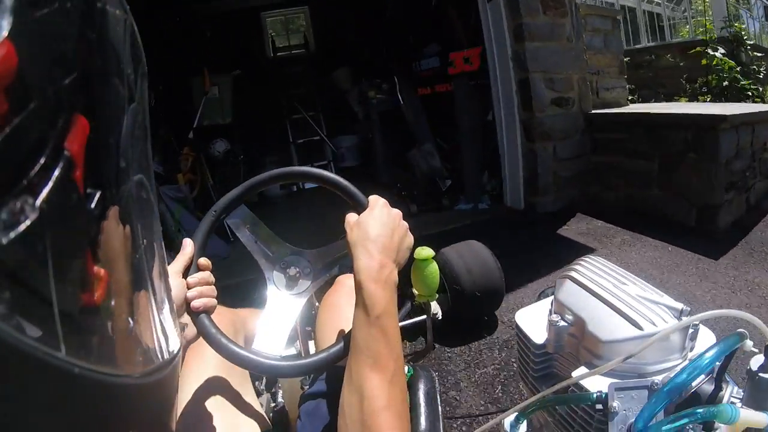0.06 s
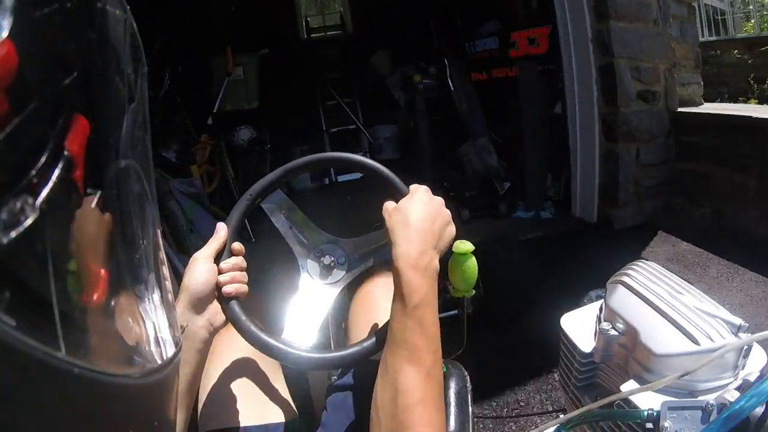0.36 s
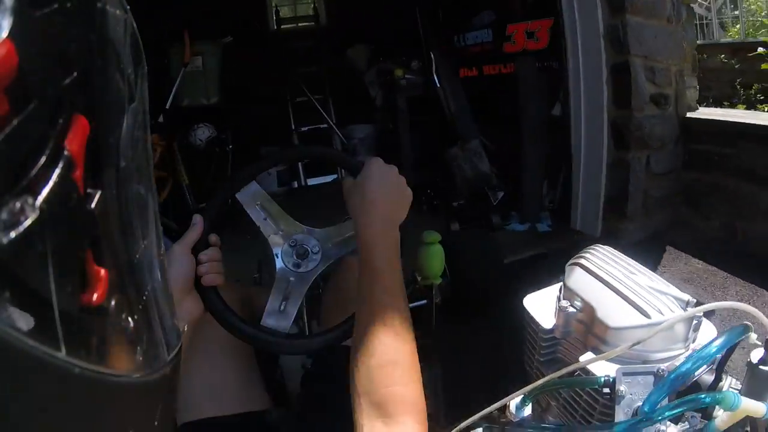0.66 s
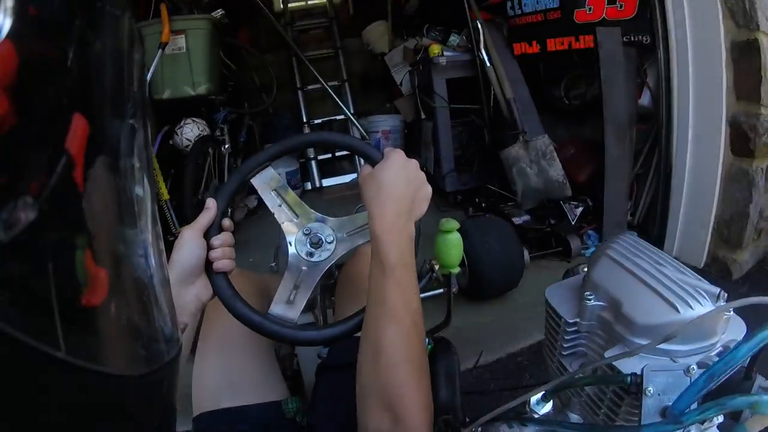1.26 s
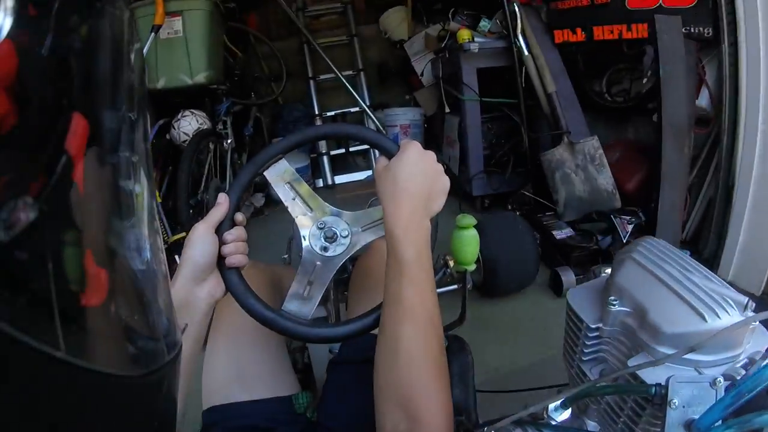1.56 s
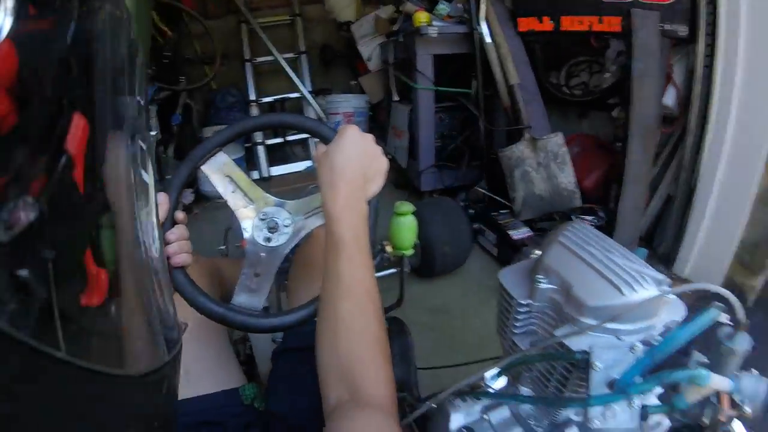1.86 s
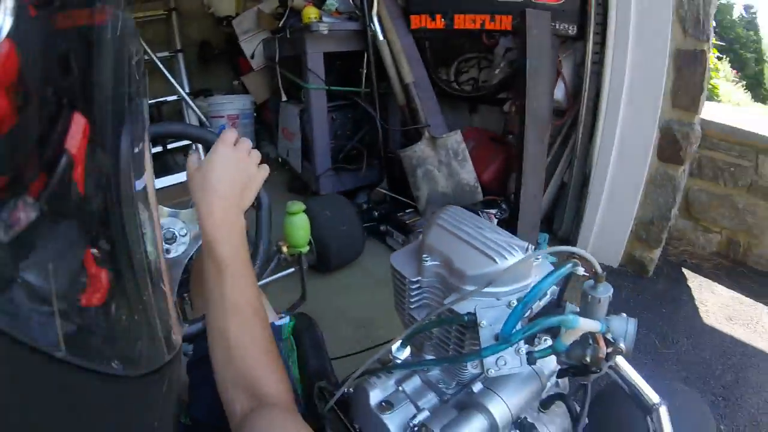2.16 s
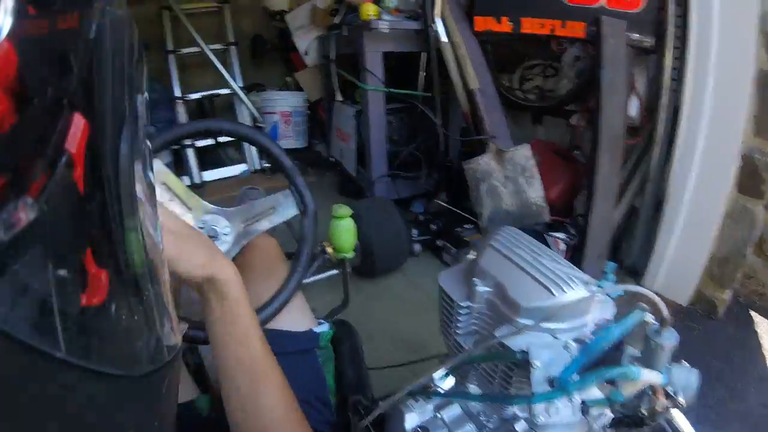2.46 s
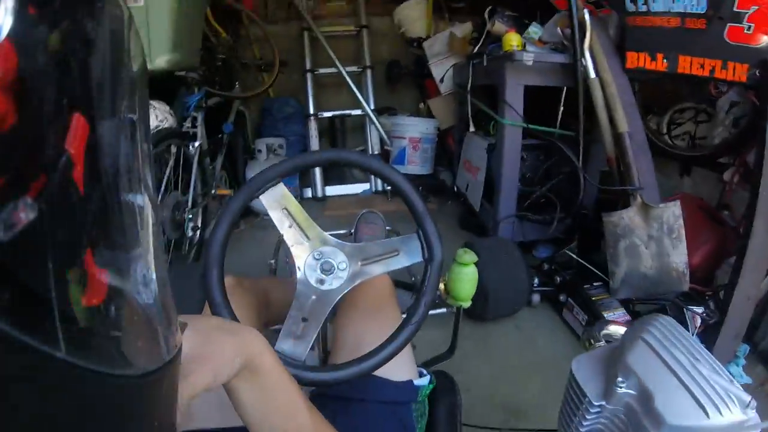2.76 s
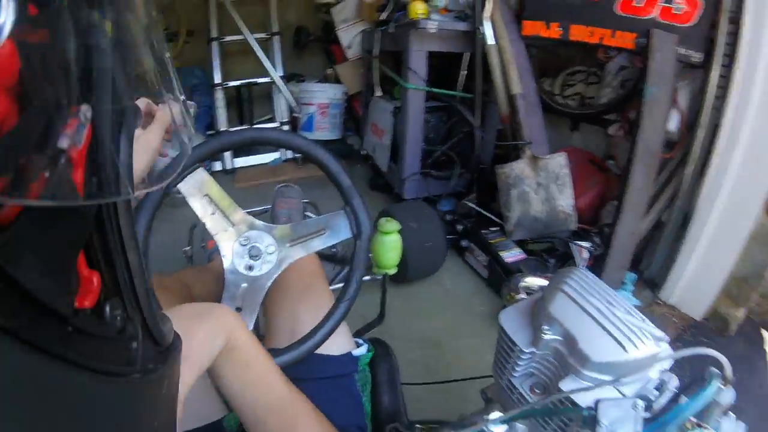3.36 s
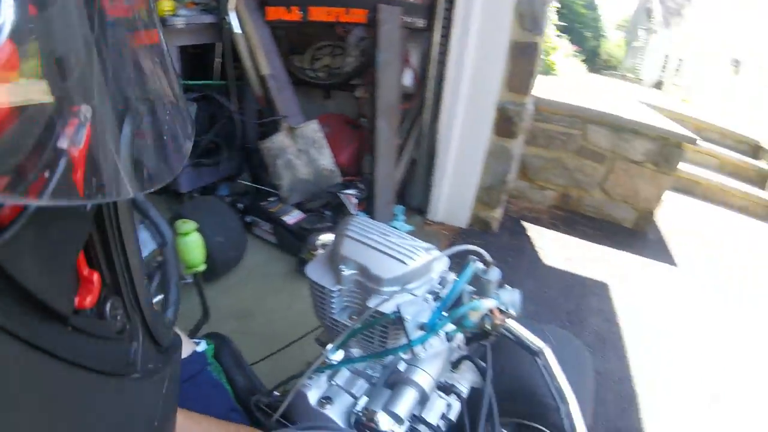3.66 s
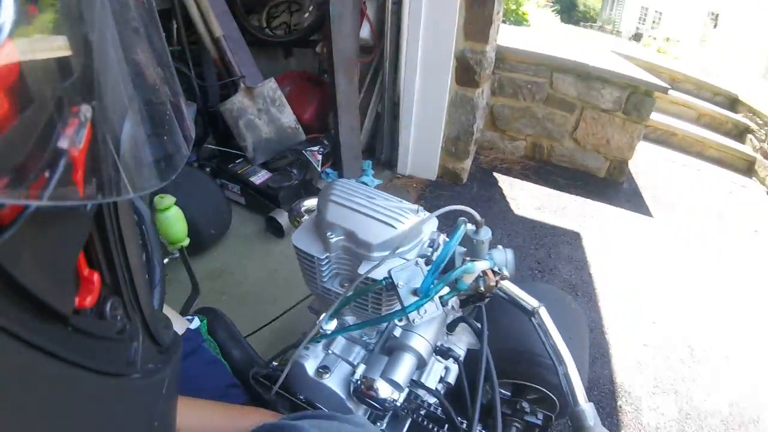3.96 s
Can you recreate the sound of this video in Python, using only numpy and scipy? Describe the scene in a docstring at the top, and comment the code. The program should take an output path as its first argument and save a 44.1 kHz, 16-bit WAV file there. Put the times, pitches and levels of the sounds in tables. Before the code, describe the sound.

A small go-kart engine idles for the whole four seconds, thumping low and evenly about eleven times a second, heard close from the driver's helmet with a short garage echo. Light metallic clatter, a whirr and a few faint ticks run along with it. A soft, dull bump comes near 2.4 seconds. At about 3 seconds the visor ratchets with one brief clack and another bump, as the engine dips slightly.

```python
"""The low, even thump of an idling kart, heard from the driver's helmet as it rolls into a garage.
Each firing of the single-cylinder four-stroke rings the exhaust and slaps back off the walls.
Valves and piston clatter in step with the crank, over stray ticks and the whirr of fan and gears.
The helmet takes a few soft bumps, and near 3 s its visor ratchets with one brief clack."""
import sys
import numpy as np
from scipy import signal
from scipy.fft import rfft, irfft
from scipy.io import wavfile

SR = 44100
rng = np.random.default_rng(int(sys.argv[2]) if len(sys.argv) > 2 else 0)


def store_wav(level_fs):
    """Save 16-bit WAV to argv[1]."""
    pcm = np.round(np.clip(np.atleast_2d(level_fs), -1, 1) * 32767)
    wavfile.write(sys.argv[1], SR, pcm.T.astype(np.int16))


N = 176400
TIME = np.arange(N) / SR
RUN_IN_S = 0.1  # the engine is already turning this long before the scene opens

# The swell and dip of the thump. Each row: time in seconds, level in dB.
EXHAUST_LEVELS = [(0, 5), (.6, 2.8), (1.1, 2.26), (2.4, 3.1), (2.9, 2), (3.17, -3), (3.3, -0.5), (3.6, 0.5),
                  (4, 2.9)]
# The boom of exhaust and garage. Each row: pitch in Hz, level in dB, t60 in seconds, polarity.
EXHAUST_RESONANCES = [(61.4, -10, 0.11, -1), (109.8, -9.5, 0.15, 1), (138.7, -19, .14, 1),
                      (207, -7.5, 0.02, 1), (228.2, -9, 0.12, -1), (389.5, -30.5, 0.055, -1),
                      (428.3, -31.5, 0.12, 1), (576.2, -31, 0.055, 1), (855, -27.5, 0.02, -1)]
# Slap off the walls. Each row: delay in seconds, gain at the door, gain inside the garage.
WALL_ECHOES = [(.0111, 0.31, 0.34), (0.0204, 0.34, 0.51), (.0285, .05, -.04), (0.037, 0.18, -0.025)]
def exhaust():
    """Each firing's pressure pulse rings the low resonances; its echoes shift as the kart rolls in."""
    roll_in_s, firing_spread_db, mode_spread_db = 0.82, 0.25, 0.55
    paths = [(0.0004, 0.66, 0.83)] + WALL_ECHOES  # the direct sound, then the walls
    firings, lead = crank_times(0), int(RUN_IN_S * SR)
    firing_db = curve(EXHAUST_LEVELS, firings) + rng.normal(0, firing_spread_db, len(firings))
    thump = 0
    for hz, mode_db, t60, polarity in EXHAUST_RESONANCES:
        gain = from_db(firing_db + mode_db + rng.normal(0, mode_spread_db, len(firings)))
        pulses = 0
        for delay, at_door, inside in paths:
            path_gain = np.interp(firings, [0, roll_in_s], [at_door, inside])
            pulses += clicks(firings + RUN_IN_S + delay, gain * path_gain, size=N + lead)
        thump += np.sign(polarity) * ring(pulses, hz, t60)
    thump = butter(thump, hz=710, kind="low")
    return butter(thump, hz=65.3, kind="high")[lead:]


# The wavering idle. Each row: time in seconds, firings per second.
IDLE_SPEED = [(0.08, 10.5), (0.18, 11.45), (0.44, 10.87), (0.54, 11.15), (0.72, 10.4), (0.81, 11.99),
              (1.16, 11.0), (1.34, 11.5), (1.43, 11.02), (1.79, 10.9), (1.97, 10.95), (2.07, 10.73),
              (2.16, 11.19), (2.42, 11.2), (2.61, 10.7), (2.79, 11.29), (3.14, 11.52), (3.23, 10.66),
              (3.41, 11.39), (3.59, 10.62)]
def crank_times(share):
    """The moments, in seconds, at which the engine passes a given share of its cycle."""
    first_firing_s = 0.0372
    time = np.arange(-RUN_IN_S * SR, N) / SR
    cycles = np.cumsum(curve(IDLE_SPEED, time)) / SR
    cycles -= np.interp(first_firing_s, time, cycles)
    passes = np.arange(-1, np.ceil(cycles[-1])) + share
    return np.interp(passes, cycles, time, left=-1, right=-1)


# One fader for clatter and whirr. Each row: time in seconds, level in dB.
MACHINERY_LEVELS = [(0, 0), (1, 0), (2.4, 1.06), (2.9, 0.5), (3.2, -2.5), (4, 0.5)]
CLATTER_WET_DB = -4
def machinery():
    """The engine's knocks and ringing metal spill into the garage, over a steady whirr."""
    knocks = valves_and_piston()
    clatter = knocks + fins_and_covers(knocks)
    return (whirr() + garage(clatter, CLATTER_WET_DB)) * from_db(curve(MACHINERY_LEVELS, TIME))


# Knocks and puffs. Each row: share of the cycle, level in dB, decay in seconds, centre in Hz.
CYCLE_KNOCKS = [(1, -35, 0.0069, 587), (0.014, -38.5, 0.0059, 4930), (0.096, -41.5, 0.011, 910),
                (.26, -33, 0.011, 446), (.25, -39, 0.01, 1490), (.34, -48, 0.018, 570),
                (.3, -39, 0.0049, 3670), (0.9, -39, 0.0039, 1000), (1, -45, 0.00067, 8300),
                (.86, -35, 0.0047, 1130), (1, -38.5, 0.0034, 840)]
def valves_and_piston():
    """Valves, piston and gas give short gritty bursts at their own points in every cycle."""
    spread_db, jitter_s, rise_s, band_ratio = 0.5, 0.0017, 0.0011, 1.562
    knocks = 0
    for share, db, decay_s, hz in CYCLE_KNOCKS:
        starts = crank_times(share)
        late, strong = rng.standard_normal((len(starts), 2)).T
        hits = clicks(starts + jitter_s * late, from_db(db + spread_db * strong))
        envelope = fade(fade(hits, decay_s), rise_s) / (rise_s * SR)  # the second fade softens the attack
        knocks += envelope * grit(hz / band_ratio, hz * band_ratio)
    return knocks


# The engine's metallic edge. Each row: pitch in Hz, relative level in dB, t60 in seconds.
METAL_RESONANCES = [(835, -18, 0.3), (1320, -29, 0.29), (1516, -4, 0.088), (1980, -8.5, 0.038),
                    (2102, -12, 0.036), (2810, -6.5, 0.054), (4770, -5, .03), (5400, -7, 0.029)]
def fins_and_covers(knocks):
    """The knocks set the engine's fins and covers ringing."""
    metal, boost_db = 0, 11
    for hz, db, t60 in METAL_RESONANCES:
        unity_at_peak = 2 * np.log(1000) / (t60 * SR)
        metal += from_db(db + boost_db) * unity_at_peak * ring(knocks, hz, t60)
    return metal


# The ratchet's teeth catching. Each row: start in seconds, level in dB, treble roll-off in Hz.
RATCHET_CONTACTS = [(2.9873, -9, 2980), (2.9987, -2, 5000), (3.0085, -2.5, 7000), (3.0166, -7, 1500),
                    (3.025, -5.5, 3430), (3.0396, 4.5, 1810), (3.0445, 4.5, 2610), (3.0483, 4, 8100),
                    (3.0622, -3, 3900), (3.0675, -1, 2000), (3.0768, -2.5, 7000)]
# The plastic tone of visor and helmet. Each row: pitch in Hz, level in dB, t60 in seconds.
SHELL_RESONANCES = [(296, -27, 0.098), (475, -16, 0.036), (649, -22.5, 0.064), (875, -23.5, 0.042),
                    (1324, -24.5, 0.025), (1690, -19.5, 0.011), (2260, -21, 0.028), (3470, -36, 0.017),
                    (4870, -23, 0.018), (5460, -21.5, 0.015)]
def visor():
    """The visor scrapes over its ratchet, hardest at the clack; each contact cracks and rings the shell."""
    scrape_db, rise_s, fall_s = -24, 0.045, 0.022
    crack_db, mode_spread_db = -15, 2.5
    clack_s = max(RATCHET_CONTACTS, key=lambda row: row[1])[0]
    pressure = np.exp(-np.abs(TIME - clack_s) / np.where(TIME < clack_s, rise_s, fall_s))
    pressure *= TIME > RATCHET_CONTACTS[0][0]
    ratchet = from_db(scrape_db) * pressure * grit(low_hz=380, high_hz=2280)
    for start, db, bright_hz in RATCHET_CONTACTS:
        hit = clicks(np.array([start]), from_db([db]))
        burst = fade(hit, decay_s=0.0027) * rng.standard_normal(N)
        crack = from_db(crack_db) * butter(burst, hz=350, kind="high")
        shell = sum((-1) ** k * ring(hit, hz, t60) * from_db(rng.normal(mode_db, mode_spread_db))
                    for k, (hz, mode_db, t60) in enumerate(SHELL_RESONANCES))
        ratchet += butter(crack + shell, bright_hz, "low", order=1)
    return garage(ratchet, wet_db=-37)


# Dull bumps. Each row: start in seconds, level in dB, pitch in Hz, t60 in seconds.
HELMET_BUMPS = [(2.429, -11.5, 70.59, 0.19), (2.792, -27, 29.49, 0.13), (3.004, -25, 71.8, 0.6),
                (3.071, -9, 72.7, 0.47), (3.09, -26, 32.3, .2)]
def helmet_bumps():
    """Soft pushes on the helmet swell and die as low booms."""
    booms, rise_s = 0, 0.03
    for start, db, hz, t60 in HELMET_BUMPS:
        age = np.maximum(TIME - start, 0)
        swell = np.minimum(age / rise_s, 1)
        decay = from_db(db - 60 * np.maximum(age - rise_s, 0) / t60)
        booms += swell * decay * np.sin(2 * np.pi * hz * age)
    return booms


# Stray sharp ticks. Each row: start in seconds, level in dB.
LOOSE_TICKS = [(0.232, -30.5), (.3087, -32), (0.6754, -35), (2.472, -29), (3.2156, -34)]
def loose_parts():
    """Now and then a loose part of the kart ticks above the clatter."""
    starts, db = np.transpose(LOOSE_TICKS)
    envelope = fade(clicks(starts, from_db(db)), decay_s=0.00087)
    return garage(envelope * grit(low_hz=1900, high_hz=9300), CLATTER_WET_DB)


# The colour of the whirr. Each row: frequency in Hz, relative level in dB.
WHIRR_SPECTRUM = [(25, -1.5), (60, 15), (130, 5), (230, 5.5), (340, 8), (480, -1), (700, -9.5), (1100, -5),
                  (1500, -6.5), (1950, -6), (2250, -11), (2850, -8.5), (3400, -16.5), (4800, -11.5),
                  (6000, -20), (8000, -22.5), (10500, -17)]
def whirr():
    """Fan and gears lay down a grainy bed of noise with a slight flutter."""
    bed_db, flutter_db = -34.5, 1.54
    flutter = rms_one(butter(rng.standard_normal(N), hz=55, kind="low"))
    return from_db(bed_db + flutter_db * flutter) * rms_one(colour(grains(), WHIRR_SPECTRUM))


def garage(x, wet_db, t60=0.31):
    """The cluttered garage adds a short diffuse tail, starting at the first wall echo."""
    tail = rng.standard_normal(N) * from_db(-60 * TIME / t60) * (TIME > WALL_ECHOES[0][0])
    return x + from_db(wet_db) * signal.fftconvolve(x, tail / np.linalg.norm(tail))[:N]


def grains(unevenness_db=3):
    """Gritty noise of many tiny impacts of uneven size."""
    return rms_one(rng.standard_normal(N) * from_db(unevenness_db * np.minimum(rng.exponential(1, N), 5)))


def grit(low_hz, high_hz):
    """One band of gritty noise at unit rms."""
    return rms_one(butter(grains(), [low_hz, high_hz], "band"))


def clicks(seconds, gain, size=N):
    """One click at each time."""
    at = np.round(seconds * SR).astype(int)
    inside = (at >= 0) & (at < size)
    return np.bincount(at[inside], gain[inside], size)


def ring(x, hz, t60):
    """A unit click rings a sine of height 1 that falls 60 dB in t60 seconds."""
    radius, angle = from_db(-60 / (t60 * SR)), 2 * np.pi * hz / SR
    return signal.lfilter([0, np.sin(angle)], [1, -2 * radius * np.cos(angle), radius ** 2], x + 1e-18)


def fade(x, decay_s):
    """Each click becomes a dying envelope."""
    return signal.lfilter([1], [1, -np.exp(-1 / (decay_s * SR))], x + 1e-18)


def butter(x, hz, kind, order=2):
    """Causal Butterworth filter."""
    sections = signal.butter(order, np.clip(hz, 10, 0.45 * SR), kind, fs=SR, output="sos")
    return signal.sosfilt(sections, x + 1e-18)


def colour(x, points):
    """Equalise a sound along (Hz, dB) points."""
    hz, db = np.transpose(points)
    bins = np.fft.rfftfreq(2 * N, 1 / SR) + 1
    gain = from_db(np.interp(np.log(bins), np.log(hz), db))
    return irfft(rfft(x, 2 * N) * gain)[:N]


def curve(rows, seconds):
    """Read a curve at the given times."""
    return np.interp(seconds, *np.transpose(rows))


def from_db(db):
    """Decibels to gain."""
    return 10 ** (np.asarray(db) / 20)


def rms_one(x):
    """Scale to unit rms."""
    return x / np.sqrt(np.mean(x ** 2) + 1e-20)


def scene():
    """Kart and helmet, mixed in mono."""
    return (exhaust() + machinery() + loose_parts() + visor() + helmet_bumps())[None]


# The muffled tone of the camera housing. Each row: frequency in Hz, gain in dB.
HOUSING_TONE = [(20, 0), (5000, -5), (6050, 0.5), (6600, -14), (7500, -12), (8800, -18.5), (10500, -21),
                (11500, -26.5)]
def record(dry):
    """The camera housing dulls the treble, and the very top is cut away."""
    cutoff_hz = 12500
    top_cut = signal.cheby2(12, 60, cutoff_hz, fs=SR, output="sos")
    return signal.sosfilt(top_cut, colour(dry[0], HOUSING_TONE))[None]


dry = scene()
out = record(dry)
store_wav(out)
```